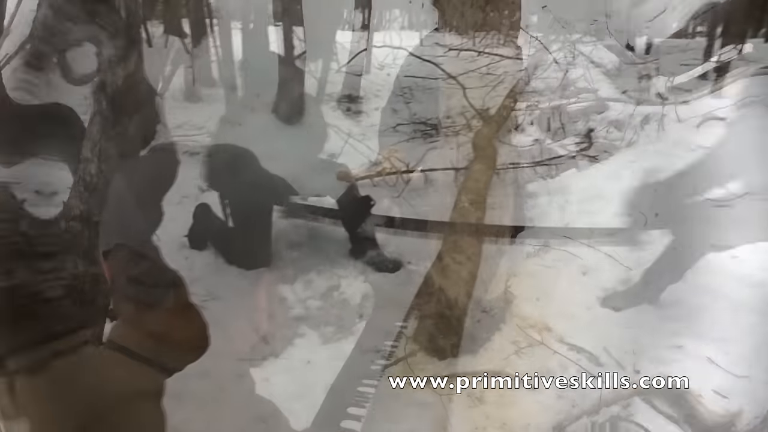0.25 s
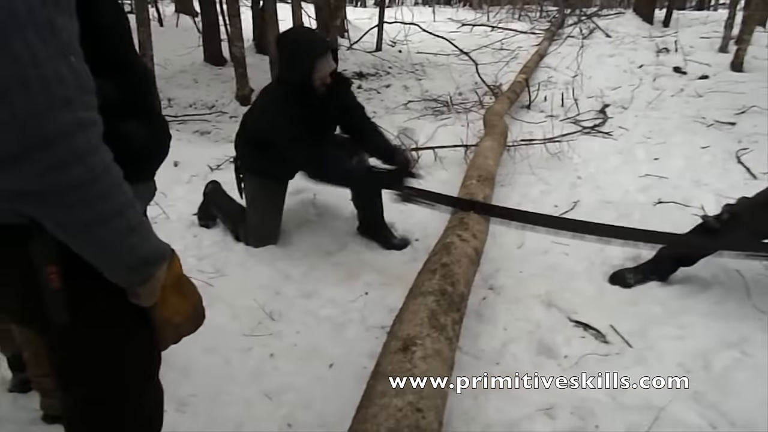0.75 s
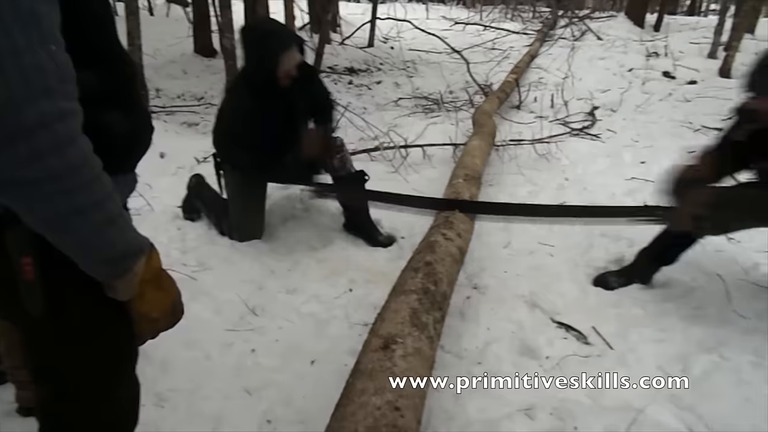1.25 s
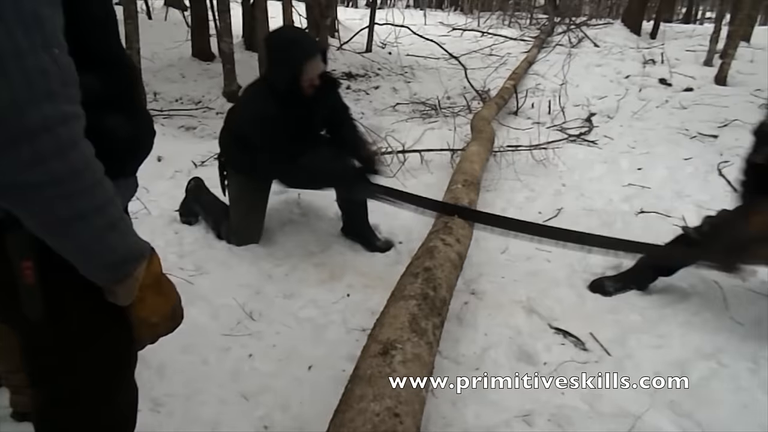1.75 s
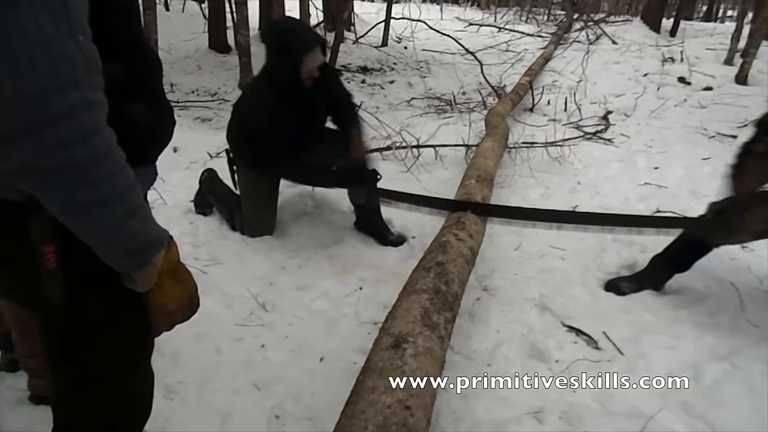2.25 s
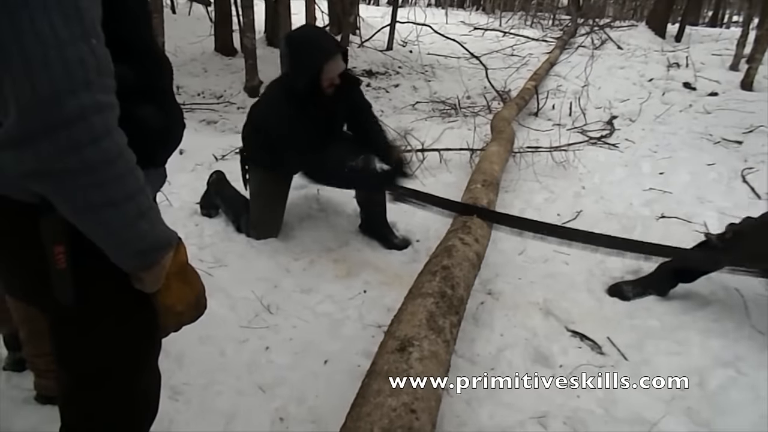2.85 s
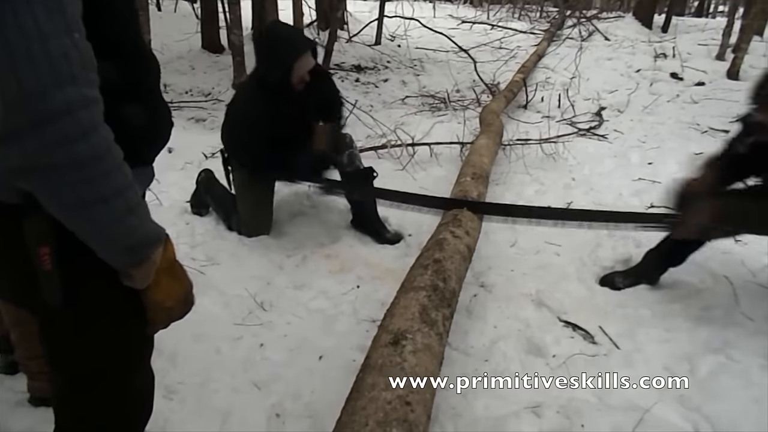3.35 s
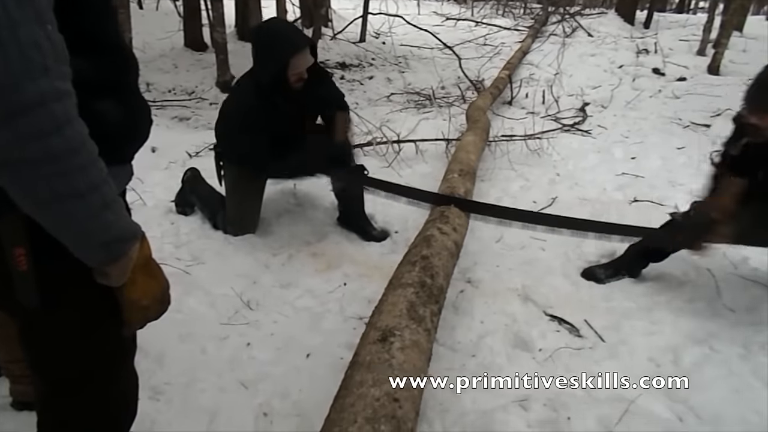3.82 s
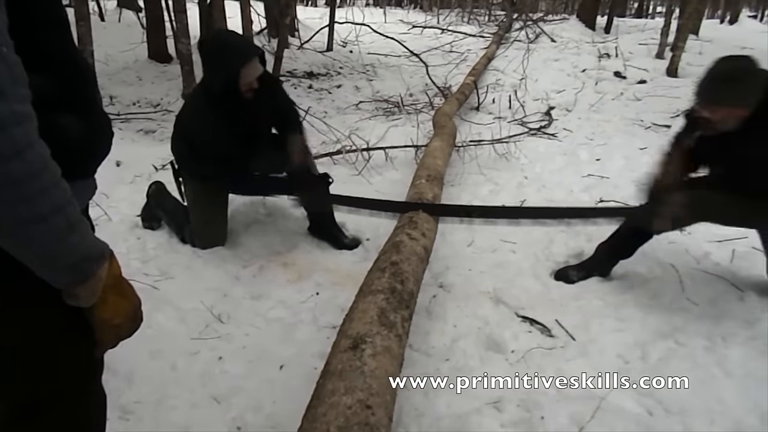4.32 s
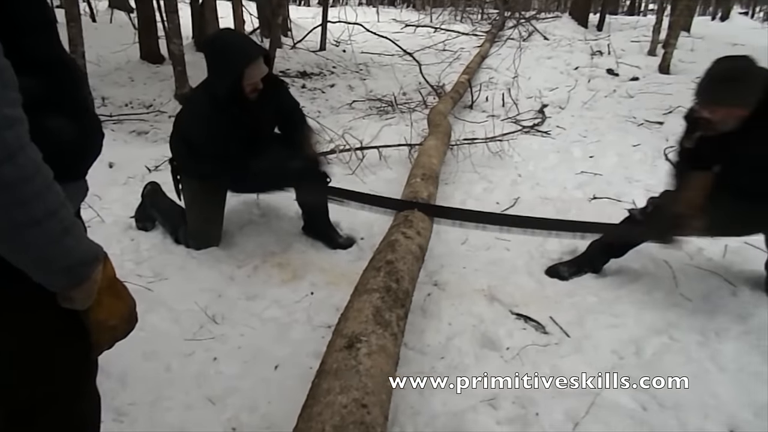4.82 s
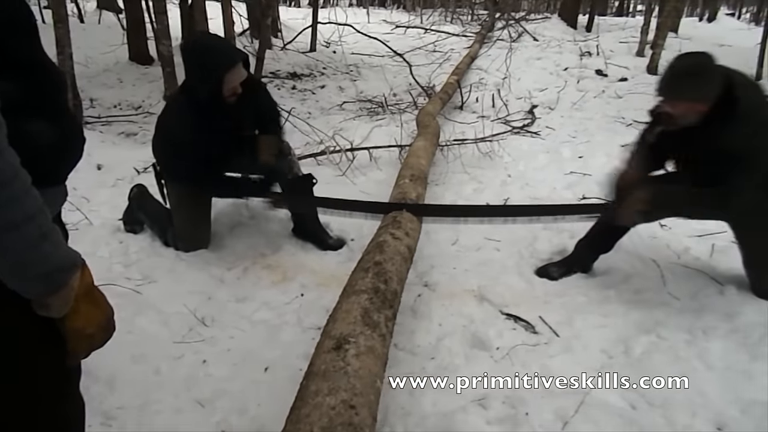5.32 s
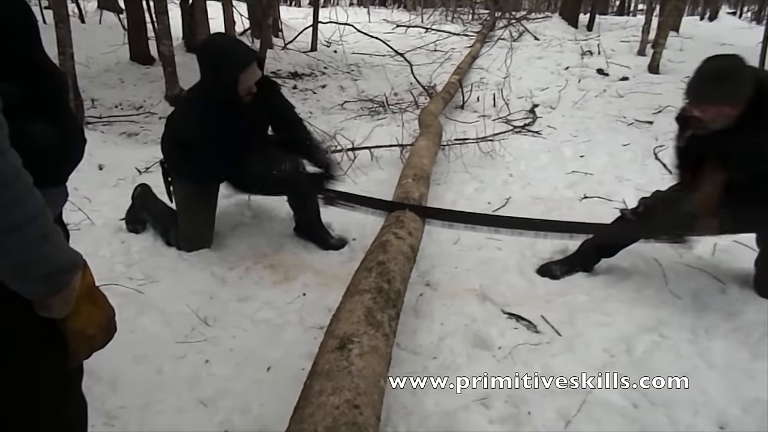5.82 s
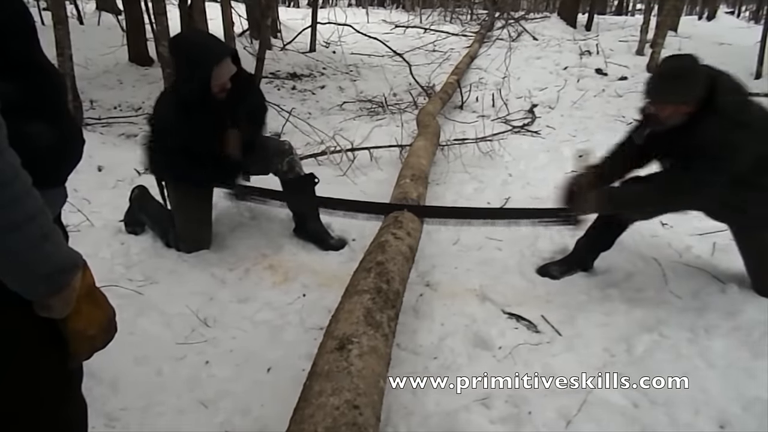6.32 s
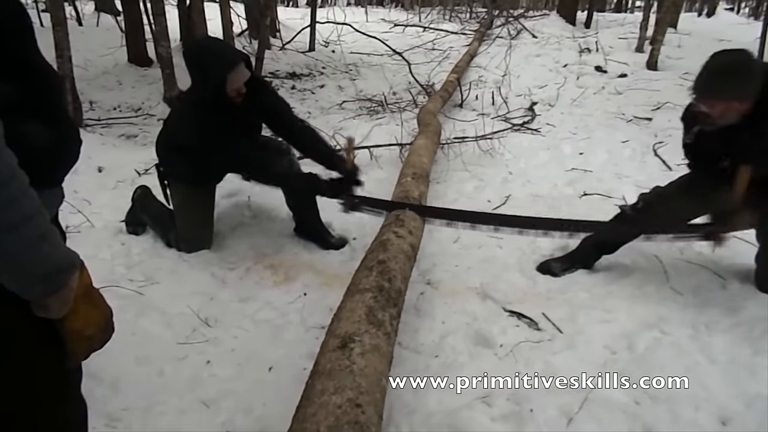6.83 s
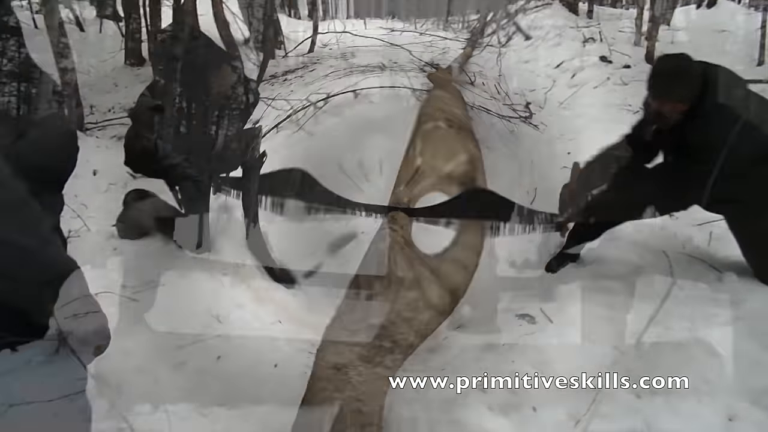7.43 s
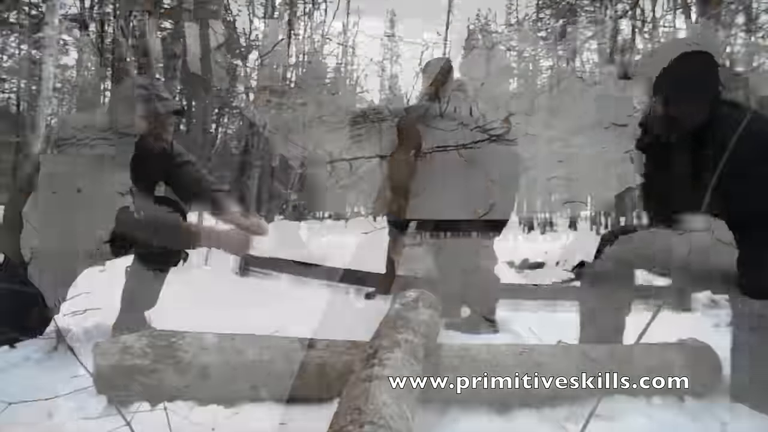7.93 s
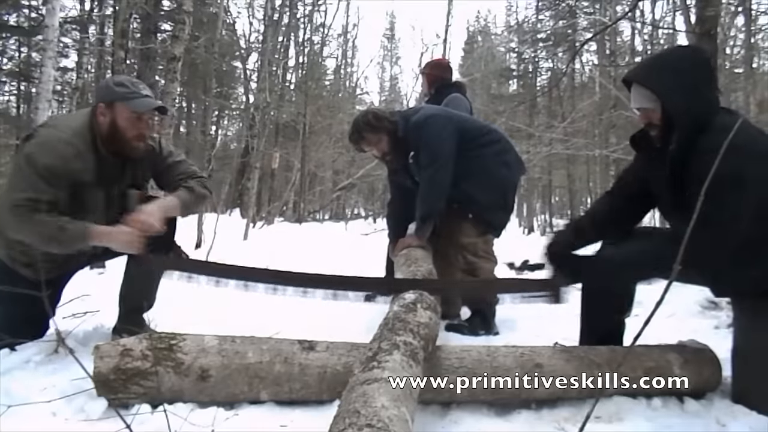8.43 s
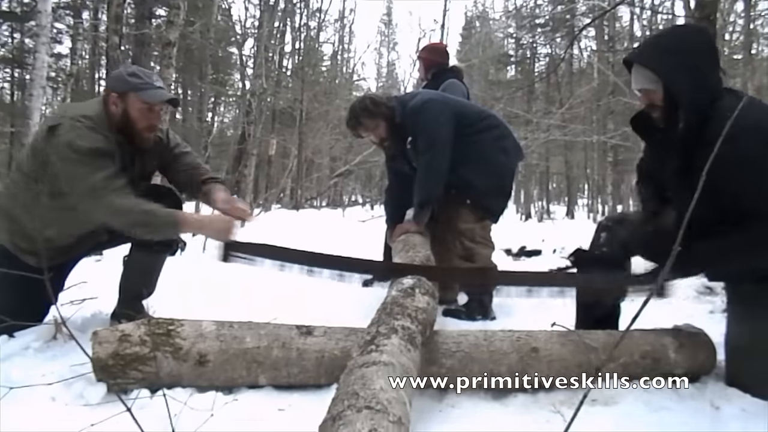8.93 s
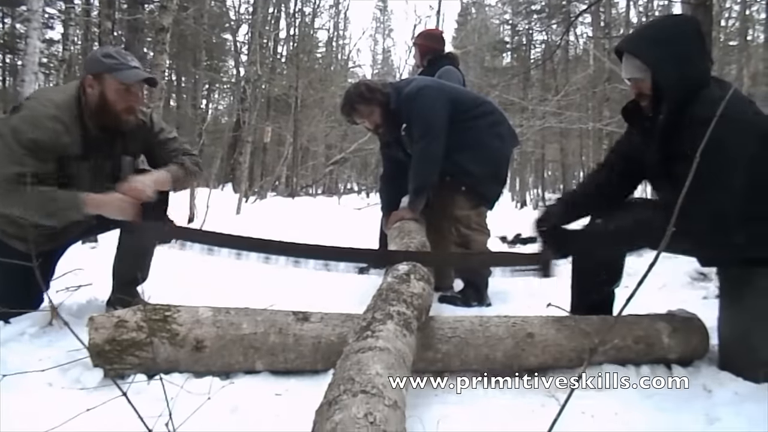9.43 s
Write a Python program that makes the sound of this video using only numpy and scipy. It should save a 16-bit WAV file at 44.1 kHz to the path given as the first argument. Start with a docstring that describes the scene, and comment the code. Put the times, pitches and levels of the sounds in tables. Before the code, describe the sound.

In still snowy woods, a long two-person crosscut saw is already cutting a log, about two strokes a second. From 0 to 7.5 seconds heavy pulls alternate with lighter ones that swell towards their ends. Each stroke layers bright tooth hiss, a coarse mid scrape and a low woody thrum, broken by quick irregular snags. At the turns the steel rings on; from about 0.9 seconds, roughly once a second, a thin high squeal, a lower groan, bright pings and a long singing note near 1300 hertz flare, then choke on the next pull. Blade knocks fall near 2.2, 2.7 and 3.7. Around 7.6 to 8 the sawing dips and crossfades to a second saw with a higher, hollower log tone and little singing. Sharp knocks come at 8.15 and in a cluster at 9.2 while strokes continue to the end. Close microphone, faint tree echoes, soft air noise.

```python
"""A long crosscut saw, pulled to and fro by two people, cuts a log in snowy woods, about two strokes a second.
Noisy bursts of tearing fibres drive filters for teeth, kerf and log: the steel hisses, the kerf scrapes, the log thrums.
Steel modes ring on through the turns; a long note, pings, squeals and groans sing over the first saw.
Near the end the scene dissolves to a second saw in a thinner log; filtered noise bursts are the blade's knocks.
Scattered echoes from the trees and a bed of coloured noise for the winter air lie behind."""
import sys
import numpy as np
from scipy import signal
from scipy.fft import rfft, irfft
from scipy.io import wavfile
from scipy.ndimage import uniform_filter1d

SR = 44100
rng = np.random.default_rng(int(sys.argv[2]) if len(sys.argv) > 2 else 0)


def generate_wav(sig):
    """Save sig (samples, or channels by samples) to the path in sys.argv[1] as 16-bit PCM at SR."""
    pcm = np.round(np.clip(np.atleast_2d(sig).T, -1, 1) * 32767).astype(np.int16)
    wavfile.write(sys.argv[1], SR, pcm)


N = 426447
T = np.arange(N) / SR
TEETH, KERF, LOG = range(3)  # the layers of a stroke

# crossfade from the first saw to the second: start [t/s], end [t/s]
DISSOLVE = (7.6, 7.97)
# broad colours of log, kerf and teeth, one list for each saw: [f/Hz], [level/dB]
LOG_COLOUR = [
    [(40, -68), (70, -25), (110, -7.5), (240, -4.5), (400, 4), (680, -1.5), (930, -8), (1150, -24),
     (1800, -51), (6000, -75)],
    [(40, -43), (90, -28), (150, -18), (310, -11.5), (400, -3), (760, 1.5), (850, -4), (1050, -9),
     (1800, -44), (6000, -65)],
]
KERF_COLOUR = [
    [(500, -17.5), (950, 3.5), (1200, 0), (1420, 5), (1900, 0.5), (2300, -1), (2850, 3.5), (3250, -0.5),
     (4000, 2), (4600, -8.5), (6500, -20.5), (11000, -55)],
    [(500, -12.5), (950, -7), (1300, 5), (1700, -1), (2400, 0.5), (3000, -1), (3600, 0.5), (4200, -1.5),
     (4800, -12), (6500, -18), (11000, -54)],
]
TEETH_COLOUR = [
    [(2500, -33), (4500, -5.5), (5600, -5), (6800, 0.5), (7400, -0.5), (8000, -0.5), (8700, -0.5),
     (9150, 2.5), (9800, -3), (11100, -2), (12000, -4.5), (13200, -6), (14600, -4), (16000, -7)],
    [(2500, -17), (4500, -6), (5300, -7), (6200, -4.5), (6600, 1), (7200, 5.5), (7800, 5.5), (8100, -6.5),
     (9400, -0.5), (10150, -5.5), (11050, 4.5), (12000, -5.5), (14000, -7), (16000, -15)],
]
# resonances of log and blade, one list for each saw: [f/Hz], width [f/Hz], lift [level/dB]
LOG_MODES = [
    [(109, 12, 1.5), (151.4, 12, 14), (216.5, 16, 11.5), (258.3, 13, 16.5), (295.8, 11, 15),
     (350, 7.7, 10.5), (414.4, 13, 6.5), (528, 10, 3), (732, 17, -2), (880, 114, 4.5)],
    [(224, 18, 24.5), (386.5, 16, 19.5), (467, 17, 19.5), (542, 17, 18), (634, 22, 15.5), (698, 22, 13.5),
     (757, 30, 11), (998, 62, 16)],
]
BLADE_MODES = [
    [(3430, 12, 5.6), (3410, 33, 4), (6750, 30, 6.2), (7100, 24, 1.5), (6910, 30, 8.7), (6540, 37, 2.4),
     (7750, 30, 10), (8420, 42, 8.5), (8980, 53, 4.6), (11300, 39, 2.2)],
    [(1930, 25, 2.6), (3370, 66, 7.7), (3545, 40, 6.4), (5600, 60, 4.5), (5780, 67, 3.6), (6540, 34, 12.3),
     (6260, 45, 4.4), (7650, 33, 2.5), (8300, 74, 8.8)],
]
# blade modes that ring on, one list for each saw: [f/Hz], t60 [t/s], against the scrape [level/dB]
AFTER_RING = [
    [(1440, 0.99, -16.5), (2880, 0.37, -37), (3346, 0.29, -17.5), (3530, 1.1, -22), (3569, 0.53, -20),
     (3810, 0.25, -21), (6680, 0.15, -12), (8060, 0.13, -17), (9040, 0.16, -10), (14196, .25, -24)],
    [(1238, 0.73, -15), (1310, .5, -29), (1900, 0.45, -24), (3340, 1.1, -13.5), (3420, 0.49, -24),
     (3600, 0.14, -26), (6400, 0.09, -22)],
]


def cutting(force_db, snag_db, thump_db, teeth_trim_db=-0.1, kerf_trim_db=-0.33, log_trim_db=0.0,
            teeth_snag=1.66, kerf_snag=1.0, log_thump=1.23):
    """Tearing fibres excite the teeth, kerf and log of each saw; the scrape also sets the blade ringing."""
    teeth = tearing(force_db, spread_db=0.0, rub=0.84, chatter_db=0.5)
    teeth *= amp(force_db + teeth_trim_db + teeth_snag * snag_db)
    kerf = tearing(force_db, spread_db=3.0, rub=0.46, chatter_db=0.3, fibres_per_s=3500)
    kerf *= amp(stroke_db(KERF) + kerf_trim_db + kerf_snag * snag_db)
    log = tearing(force_db, spread_db=1.5, rub=0.6, chatter_db=2.3)
    log *= amp(stroke_db(LOG) + log_trim_db + log_thump * thump_db)

    second = np.interp(T, DISSOLVE, (0, 1))
    shares = np.sqrt(1 - second), np.sqrt(second)  # equal-power crossfade
    rasp, thrum, rings = np.zeros((3, N))
    for k, share in enumerate(shares):
        rasp += body(share * teeth, TEETH_COLOUR[k], BLADE_MODES[k])
        rasp += body(share * kerf, KERF_COLOUR[k], BLADE_MODES[k])
        thrum += body(share * log, LOG_COLOUR[k], LOG_MODES[k])
        rings += after_ring(share * kerf, AFTER_RING[k])

    # the blade rings most when a long end hangs free of the log
    starts, lengths, *_, free_db = np.transpose(STROKES)
    overhang_db = np.interp(T, starts + lengths, free_db)
    rings *= amp(overhang_db + 1.2 * wander(70))  # the kerf brushes the ringing steel and roughens it
    rasp = sliding(rasp, patchy_db=2.0, fine_db=3.0)
    thrum = sliding(thrum, patchy_db=0.5, fine_db=3.0)
    return rasp + thrum + rings


def tearing(force_db, spread_db, rub, chatter_db, fibres_per_s=7000, teeth_per_s=170):
    """Fibres snap over a smooth rub, in bunches as each tooth passes; a harder stroke is a faster one."""
    speed = amp((force_db - force_db.max()) / 4)  # 1 at the hardest moment
    tooth_turns = np.cumsum(teeth_per_s * speed * (1 + .45 * wander(65.9))) / SR
    struck = rng.random(N) < fibres_per_s / SR
    signs = rng.choice([-1, 1], N)
    sizes = amp(spread_db * np.minimum(rng.exponential(1, N), 4))
    snaps = evened(struck * signs * sizes)
    bunching = amp(chatter_db * np.sin(2 * np.pi * tooth_turns))
    return evened((snaps + rub * rng.standard_normal(N)) * bunching)


# strokes, heavy and light in turn, then the second saw, before trims: start [t/s], length [t/s],
# teeth hiss [level/dB], kerf scrape [level/dB], log thrum [level/dB], free ring at the turn [level/dB]
STROKES = [(0.075, 0.45, -32.0, -39.5, -42, -3), (0.485, 0.55, -28.5, -35.0, -38, 4.5),
           (1.095, 0.48, -24.5, -32, -34, -7), (1.563, 0.52, -29.0, -35, -38.5, 5),
           (2.155, 0.5, -25.0, -32.5, -33, -9), (2.641, 0.5, -29.5, -35.5, -38, 2),
           (3.198, 0.47, -25.0, -31.5, -33.0, -5), (3.676, 0.49, -28.5, -35, -37, 1.5),
           (4.224, 0.45, -25.0, -31, -32, -14), (4.663, 0.47, -29, -34, -38.0, 0),
           (5.206, 0.44, -25.0, -30, -31.5, -14), (5.615, 0.46, -29.5, -32, -38.5, -4),
           (6.155, 0.41, -24.5, -30, -32.5, -19), (6.56, 0.44, -30.5, -34, -39.5, 0),
           (7.07, 0.4, -24.5, -30, -31, -16.5), (7.458, 0.4, -35, -40.5, -41.5, -1.5),
           (7.649, 0.55, -36.5, -39, -39.0, 1), (8.204, 0.47, -28.5, -34.5, -34.5, -10),
           (8.719, 0.44, -31.5, -34, -32.5, -3), (9.194, 0.47, -29, -34.5, -33.5, -3)]
# stroke shapes, a row each for teeth, kerf and log:
# share spent speeding up [0-1], share spent slowing down [0-1], growth over the stroke [level/dB]
HEAVY_PULL = [(.42, 0.25, -4), (0.41, 0.27, -2), (0.28, 0.22, 0.5)]
LIGHT_PULL = [(0.24, .28, 20.3), (0.33, 0.3, 12.5), (0.25, 0.36, 4)]
SECOND_SAW = [(.3, .35, 18.16), (0.28, .33, 19.5), (0.27, 0.23, 6.2)]
# sink of teeth, kerf and log at either end of a stroke: [level/dB] each
TURN_DIP_DB = (27.5, 23, 18)


def stroke_db(layer, bend=1.5, rest_db=-63):
    """Level of one layer: each stroke speeds up, bears on and slows down to the turn."""
    power = np.full(N, amp(rest_db) ** 2)
    for k, (start, length, *levels) in enumerate(STROKES):
        shape = SECOND_SAW if start > DISSOLVE[0] else LIGHT_PULL if k % 2 else HEAVY_PULL
        rise, fall, growth_db = shape[layer]
        first = max(int((start - length / 2) * SR), 0)
        near = slice(first, int((start + length + length / 2) * SR))
        u = (T[near] - start) / length  # 0 to 1 through the stroke
        speeding_up = np.maximum(1 - u / rise, 0) ** bend
        slowing_down = np.maximum(1 - (1 - u) / fall, 0) ** bend
        dip_db = TURN_DIP_DB[layer] * (speeding_up + slowing_down)
        power[near] += amp(levels[layer] + growth_db * (u - .5) - dip_db) ** 2
    return 10 * np.log10(power)


# a group of teeth digs in hard, before easing and scaling:
# [t/s], swell of the rasp [level/dB], jerk of the log [level/dB]
SNAGS = [(.226, 2.5, 2), (.37, 4.5, 6), (.578, 7, 5.5), (0.648, 6, 4), (.75, 4.5, -2), (.788, 5.5, 2),
         (.828, 5.5, 6), (.866, 4.5, 10.5), (.924, 3, 12), (1.148, 7.5, 3), (1.245, 1, 13.5),
         (1.272, 1.5, 13), (1.298, 4.5, 9), (1.35, 4.5, 2), (1.68, 7.5, -1), (1.712, 6, 6), (1.782, 5.5, 5),
         (1.834, 6, 6), (1.872, 7, 12.5), (1.906, 5.5, 15.5), (1.958, 3, 14.5), (2.2, 6, 11),
         (2.286, 5, 9.5), (2.347, 4, 1), (2.587, 2, 7), (2.803, 6, 12.5), (2.915, 5.5, 7), (2.95, 7, 8),
         (2.988, 5.5, 10), (3.312, 4, 10), (3.374, 5, 4.5), (3.568, 2.5, 3), (3.824, 2.5, 6),
         (4.018, 2.5, 8), (4.064, 5.5, -1), (4.316, 4.5, 8), (4.39, 3, 4), (4.558, 4, 8), (4.598, 3, 7),
         (4.808, 4.5, 11), (4.99, 5.5, 0), (5.316, 4.5, 10.5), (5.43, 3.5, 2), (5.766, 4, 11),
         (5.846, 4.5, 5), (5.88, 4.5, 8.5), (5.974, 3, 6), (6.187, 2, 10.5), (6.222, 5, 12), (6.72, 6, 4.5),
         (6.788, 4.5, 0), (6.896, 5, 5), (7.092, 1.5, 9.5), (7.134, 4, 11.5), (7.265, 3.5, 2),
         (7.415, 1, 13.5), (7.61, 5, 10), (8.02, 3, 8.5), (8.88, 2, 10), (8.962, 6, -3), (9.057, 4, 0),
         (9.446, 4, 5.5), (9.594, 3.5, 2)]
SNAG_RISE_S, SNAG_FALL_S = 0.0061, 0.014
CATCHES_PER_S = 20  # typical rate of lesser catches, unevenly spread


def snagging(rasp_catch_db=4.0, log_catch_db=5.5, uneven=.5):
    """Swells of the rasp and of the log in dB: hard snags and small chance catches, with an easing between them."""
    t = np.arange(-SR // 10, SR // 10) / SR
    bite = np.exp(-.5 * (t / np.where(t < 0, SNAG_RISE_S, SNAG_FALL_S)) ** 2)
    passed = np.floor(np.cumsum(CATCHES_PER_S * np.exp(uneven * wander(25))) / SR)
    catches = np.diff(passed, prepend=0) * rng.random(N)
    catches = signal.oaconvolve(catches, bite, "same")
    hard = np.zeros((2, N))
    for s, rasp_db, log_db in SNAGS:
        hard[:, int(s * SR)] += rasp_db, log_db
    hard = signal.oaconvolve(hard, bite[None], "same", axes=1)
    swells = np.maximum(hard, np.outer((rasp_catch_db, log_catch_db), catches))
    return swells - uniform_filter1d(swells, size=4000)  # ease off around each swell


# colour the first saw gains on heavy strokes and loses on light ones, at full lean: [f/Hz], [level/dB]
LEAN = [(150, -0.1), (255, 1), (400, 0), (700, -0.1), (950, 0.2), (1400, -0.5), (2700, 1.2), (3500, -0.3),
        (5000, 1.1), (8000, 0.5), (11000, -0.5), (14400, 0)]


def sliding(x, patchy_db, fine_db):
    """The colour leans with the direction of the stroke; resonances swell and fade as the contact slides."""
    f, t, z = signal.stft(x, fs=SR, nperseg=1024, noverlap=768)
    broad, fine = rng.standard_normal((2,) + z.shape)
    broad = uniform_filter1d(uniform_filter1d(broad, size=9, axis=0), size=6, axis=1)
    fine = uniform_filter1d(uniform_filter1d(fine, size=2, axis=0), size=14, axis=1)
    patches = evened(amp(patchy_db * evened(broad) + fine_db * evened(fine)))
    strokes = np.interp(t, [row[0] for row in STROKES], np.arange(len(STROKES)))
    direction = np.tanh(2 * np.sin(np.pi * strokes)) * np.interp(t, DISSOLVE, (1, 0))
    lean_db = np.interp(f, *np.transpose(LEAN))[:, None] * direction
    return signal.istft(z * patches * amp(lean_db), nperseg=1024, noverlap=768)[1][:N]


def after_ring(x, modes):
    """Lightly damped steel modes, each of energy 1 before its gain, ring on after the teeth let go."""
    t = T[:SR // 2]
    response = np.zeros(len(t))
    for hz, t60, db in modes:
        ring = np.sin(2 * np.pi * hz * t) * amp(-60 * t / t60)
        response += amp(db) * ring / np.linalg.norm(ring)
    return signal.oaconvolve(x, response)[:N]


# the steel cries out late in each light stroke: [t/s], thin squeal [level/dB], lower groan [level/dB],
# ping of the teeth [level/dB], long singing note [level/dB]
SQUEALS = [(.9, -36, -50, -39, -40), (1.952, -38, -49, -57, -48.5), (2.988, -33, -44, -47, -40),
           (4.001, -33, -52, -48, -54), (4.992, -38, -41, -45, -45), (5.95, -31, -57, -36.5, -41),
           (6.864, -35, -44, -44, -47), (7.76, -39, -52, -53, -60)]
SING_HZ, SING_WANDER_HZ = 1313, 3.5  # pitch and its rms drift


def singing(drive_db, rubbed_db=-26, build_db_per_s=85, fade_db_per_s=14, free_s=0.31,
            choke_db_per_s=110, waver_db=-0.3):
    """The free length of the first blade holds one long note until the next pull chokes it."""
    present = np.interp(T, (.45, .7, 7.3, 7.7), (0, 1, 1, 0))
    pitch_hz = SING_HZ + SING_WANDER_HZ * wander(20.2)
    note = np.sqrt(2) * np.sin(2 * np.pi * np.cumsum(pitch_hz) / SR)
    power = amp(drive_db + rubbed_db) ** 2
    for s, *_, db in SQUEALS:
        t = T - s
        away_db = np.maximum(-build_db_per_s * t, fade_db_per_s * t)
        choke_db = choke_db_per_s * np.maximum(t - free_s, 0)
        power += amp(db - away_db - choke_db) ** 2
    return present * note * np.sqrt(power) * amp(waver_db * wander(22.4))


def squealing(start_hz=15100, end_hz=14250, width_hz=220, length_s=.06, glide_s=.09,
              groan_start_hz=1560, groan_end_hz=1400, groan_width_hz=110, groan_s=0.076):
    """A thin squeal and a lower groan of the steel slide down and settle as the stroke runs out."""
    times, squeal_db, groan_db, *_ = np.transpose(SQUEALS)
    nearest = np.searchsorted((times[1:] + times[:-1]) / 2, T)
    t = T - times[nearest]
    squeal = whistle(np.interp(t, (-glide_s, 0), (start_hz, end_hz)), width_hz)
    groan = whistle(np.interp(t, (-glide_s, 0), (groan_start_hz, groan_end_hz)), groan_width_hz)
    squeal *= amp(squeal_db[nearest]) * np.exp(-.5 * (t / length_s) ** 2)
    groan *= amp(groan_db[nearest]) * np.exp(-.5 * (t / groan_s) ** 2)
    return squeal + groan


# ringing of the teeth, against the shared ping level: [f/Hz], width [f/Hz], [level/dB]
PINGS = [(8150, 46.5, 7.5), (10836, 18, 6)]


def pinging(drive_db, rubbed_db=-21, flicker_db=3, after_squeal_s=0.027, build_db_per_s=350, fade_db_per_s=200):
    """The teeth ping faintly all through the first saw's cut, and brightly just after each squeal."""
    level = amp(drive_db + rubbed_db) * np.interp(T, DISSOLVE, (1, 0))
    for s, _, _, db, _ in SQUEALS:
        t = T - s - after_squeal_s
        away_db = np.maximum(-build_db_per_s * t, fade_db_per_s * t)
        level = np.hypot(level, amp(db - away_db))
    return level * sum(amp(db + flicker_db * wander(24)) * whistle(hz, width) for hz, width, db in PINGS)


# blows of the blade in the kerf as it turns round: [t/s], [level/dB], hardness [0-1]
KNOCKS = [(0.558, -39, 0.9), (2.189, -30.5, 0.78), (2.71, -34, .9), (3.729, -32, .7), (5.215, -39, 0.9),
          (6.159, -54, 1), (7.540, -42, 0.6), (8.157, -29, 0.88), (9.179, -30, .2), (9.200, -36, 0.5),
          (9.2128, -28.5, 0.6)]
# broad colour of a blow: [f/Hz], [level/dB]
KNOCK_COLOUR = [(80, -13), (300, 11.5), (700, -3), (1300, -3.5), (2400, 3), (4500, -3.5), (8000, 0.5),
                (15000, -7)]


def knocking(crack_t60=0.053, rattle_t60=0.13, rattle_db=-13, dull_hz=2600):
    """The slack blade slaps the side of the kerf: a crack and a short steel rattle, duller for a soft blow."""
    t = T[:SR // 2]
    decay = amp(-60 * t / crack_t60) + amp(rattle_db - 60 * t / rattle_t60)
    softening = signal.butter(2, dull_hz, fs=SR, output="sos")
    blows = np.zeros(N + len(t))
    for s, db, hardness in KNOCKS:
        crack = amp(db) * decay * rng.standard_normal(len(t))
        hard = np.clip(hardness, 0, 1)
        blow = hard * crack + (1 - hard) * signal.sosfilt(softening, crack)
        blows[int(s * SR):][:len(t)] += blow
    return body(blows[:N], KNOCK_COLOUR, BLADE_MODES[1])


def trunks(x, echo_db=-21, t60=0.32):
    """Faint scattered echoes from the trees: sparse random taps that die away."""
    t = T[:SR // 2]
    taps = rng.standard_normal(len(t)) * (rng.random(len(t)) < 2000 / SR)  # 2000 echoes a second
    taps *= (t > .008) * amp(-60 * t / t60)
    return amp(echo_db) * signal.oaconvolve(x, taps / np.linalg.norm(taps))[:N]


# broad colour of the winter air: [f/Hz], [level/dB]
WOODS = [(25, -25), (50, -15), (90, 2), (250, 12.5), (500, -12), (1500, -14), (5000, -3), (8000, -32),
         (16000, -47)]
WOODS_DB = -57


def winter_air():
    """Still air among the trees: steady noise through one broad colour."""
    return amp(WOODS_DB) * body(rng.standard_normal(N), WOODS)


def amp(db):
    """Amplitude ratio of a level in dB."""
    return 10 ** (np.asarray(db) / 20)


def evened(x):
    """Scales x to rms 1."""
    return x / np.sqrt(np.mean(x ** 2) + 1e-20)


def wander(hz):
    """Smooth chance of rms 1, mostly slower than hz."""
    f = np.fft.rfftfreq(N, 1 / SR)
    return evened(irfft(rfft(rng.standard_normal(N)) * np.exp(-(f / hz) ** 2), N))


def body(x, colour, modes=(), size=8192):
    """Rings x through a causal filter of energy 1: a broad colour lifted by narrow resonances."""
    f = np.fft.rfftfreq(size, 1 / SR)
    at, db = np.transpose(colour)
    lift = 1 + sum((amp(d) ** 2 - 1) / (1 + (2 * (f - hz) / width) ** 2) for hz, width, d in modes)
    gain = amp(np.interp(np.log(f + 1), np.log(at), db)) * np.sqrt(np.maximum(lift, .1))
    log_gain = np.log(np.r_[gain, gain[-2:0:-1]])
    spectrum = np.exp(np.conj(signal.hilbert(log_gain)))  # minimum phase
    response = np.fft.ifft(spectrum).real[:size // 2]
    return signal.oaconvolve(x, response / np.linalg.norm(response))[:N]


def whistle(hz, width):
    """A narrow resonance, steady or gliding, kept ringing by friction; rms 1."""
    r = np.exp(-np.pi * abs(width) / SR)
    noise = rng.standard_normal(N) + 1j * rng.standard_normal(N)
    swing = signal.lfilter([1 - r], [1, -r], noise)
    carrier = np.exp(2j * np.pi * np.cumsum(hz * np.ones(N)) / SR)
    return evened((swing * carrier).real)


def scene():
    """The saw among the trees over still winter air, the same in both channels."""
    force_db = stroke_db(TEETH)
    snag_db, thump_db = snagging()
    saw = cutting(force_db, snag_db, thump_db)
    saw += singing(force_db)
    saw += pinging(force_db + snag_db)
    saw += squealing()
    saw += knocking()
    air = winter_air()
    return np.tile(saw + trunks(saw) + air, (2, 1))


LOW_CUT_HZ, EDGE_HZ = 78, 15780


def record(dry):
    """A gentle low cut thins the rumble and a steep band limit closes the top."""
    low_cut = signal.butter(2, LOW_CUT_HZ, "high", fs=SR, output="sos")
    thinned = signal.sosfilt(low_cut, dry)
    band_limit = signal.firwin(1023, EDGE_HZ, window=("kaiser", 9), fs=SR)
    return signal.oaconvolve(thinned, band_limit[None], "same")


dry = scene()
out = record(dry)
generate_wav(out)
```